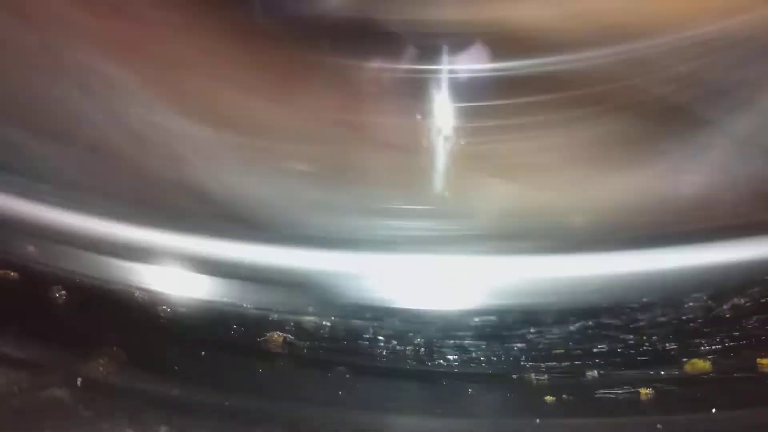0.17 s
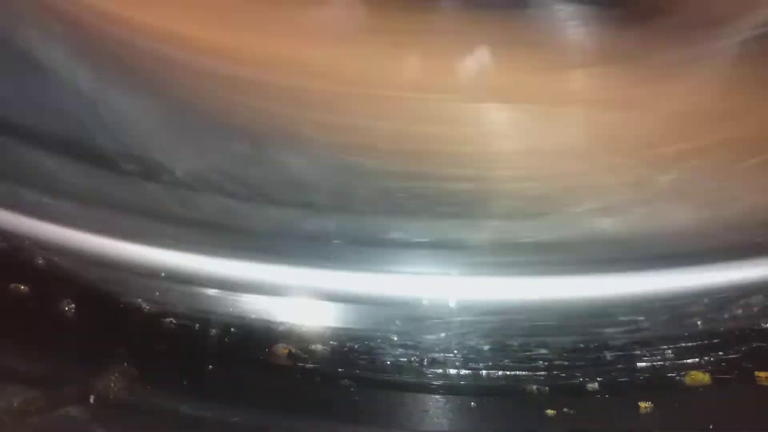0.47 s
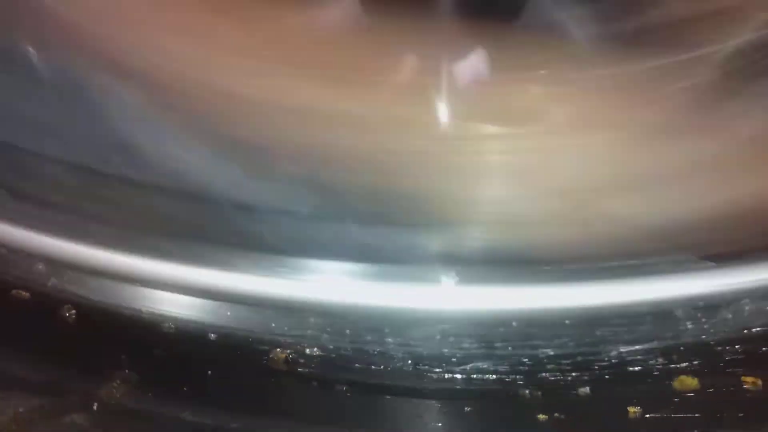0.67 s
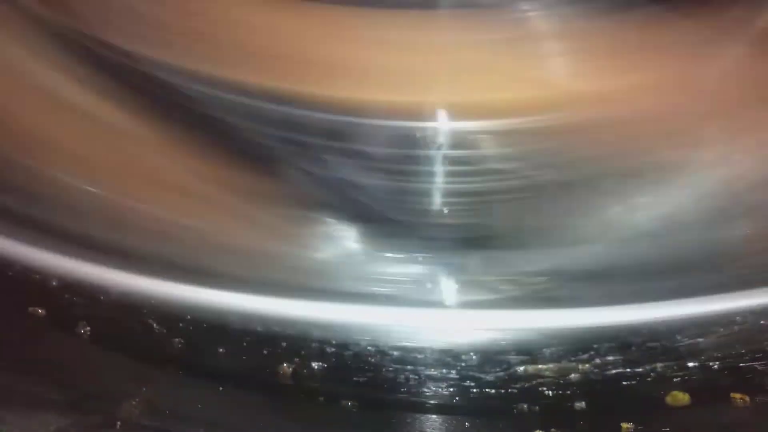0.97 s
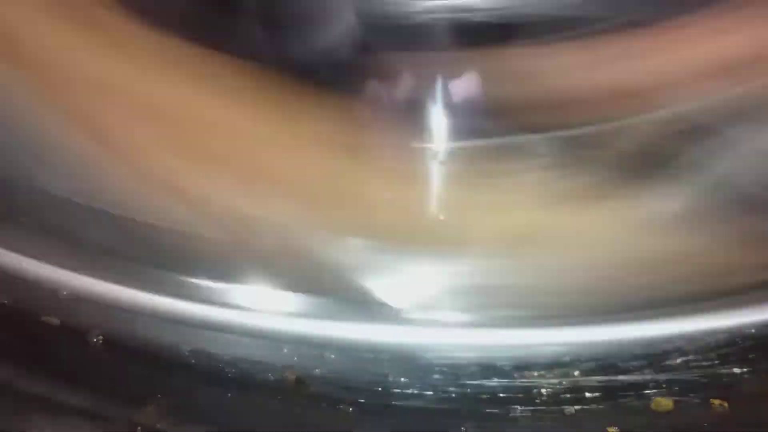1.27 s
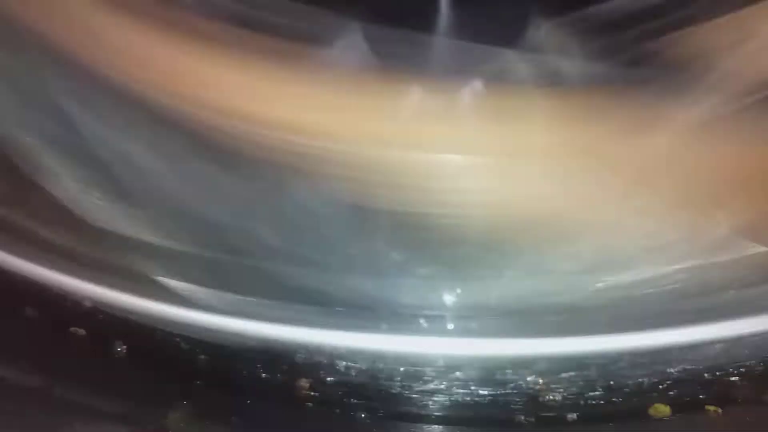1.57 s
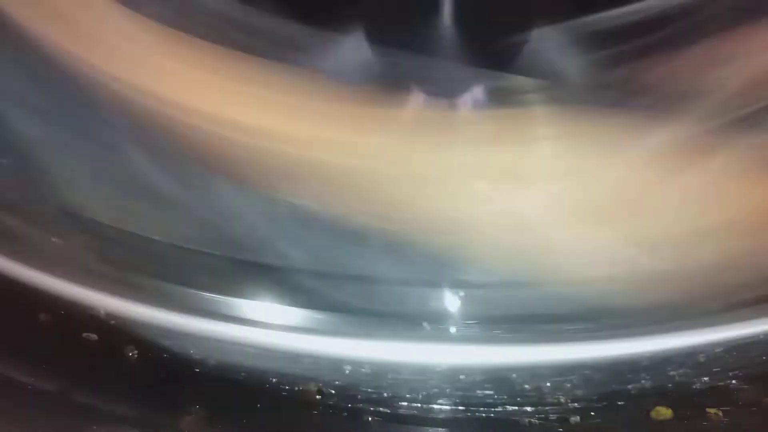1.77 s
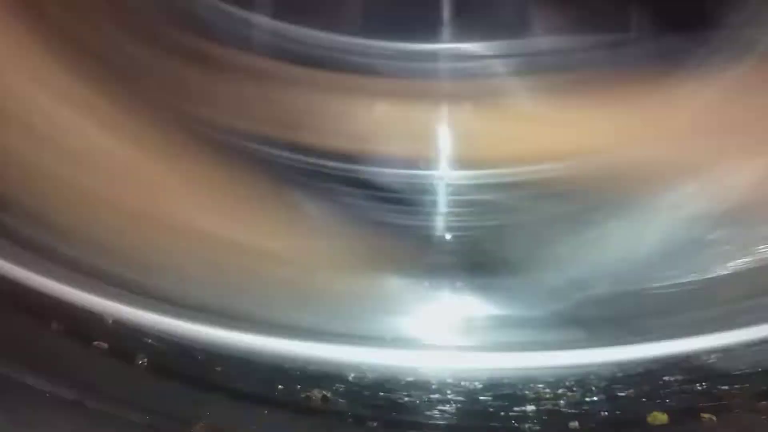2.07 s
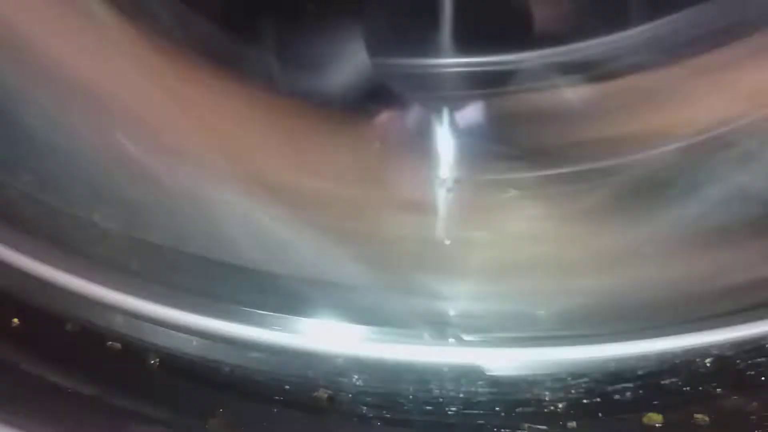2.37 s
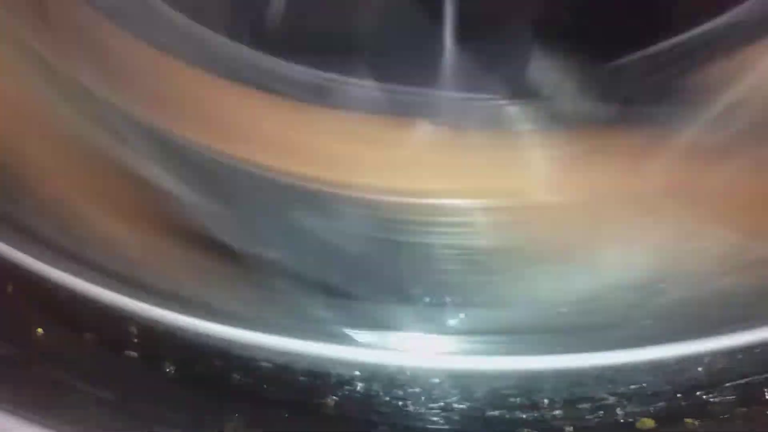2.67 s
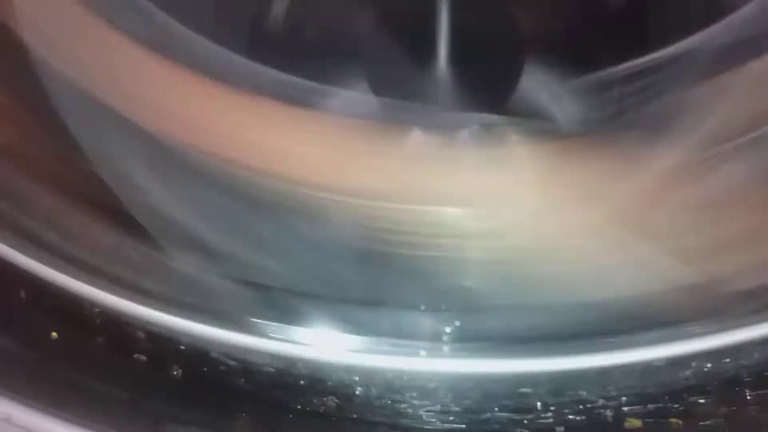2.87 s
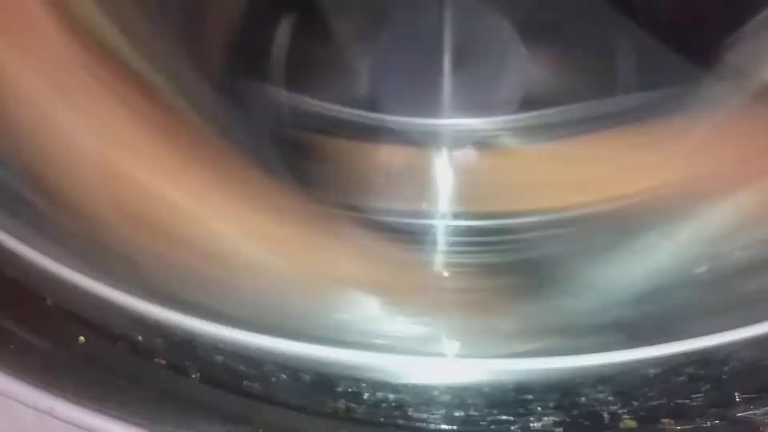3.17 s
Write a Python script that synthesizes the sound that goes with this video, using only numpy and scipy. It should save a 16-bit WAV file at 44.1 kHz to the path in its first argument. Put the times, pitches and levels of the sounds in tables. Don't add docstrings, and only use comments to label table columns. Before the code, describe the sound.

A honey extractor already spinning runs steadily throughout, about four turns a second: a wavering mid-pitched gear whir near 400 Hz, a fainter octave above, and a resonant steel rumble. Spray hisses about eight pulses a second, with irregular ticks and tiny drops. Low air buffets the close microphone, strongest from 0.6 to 1.9 seconds, easing by 2.6, leaving the whir and slightly brighter hiss clearer. Faint electronic whine lies underneath.

```python
import sys
import numpy as np
from scipy import signal
from scipy.fft import rfft, irfft
from scipy.io import wavfile

SR = 44100
rng = np.random.default_rng(int(sys.argv[2]) if len(sys.argv) > 2 else 0)


def store_wav(level_fs):
    pcm = np.round(np.clip(np.atleast_2d(level_fs), -1, 1) * 32767)
    wavfile.write(sys.argv[1], SR, pcm.T.astype(np.int16))


def boost_factor(decibels):
    exponent = np.asarray(decibels, float) / 20
    return 10 ** exponent


N = 146853
T = np.arange(N) / SR

# multiple_of_1_khz, level_db (rms)
CLOCK_WHINE = [(1, -50), (4, -66), (5, -71), (6, -69), (7, -79), (11, -86), (12, -86), (13, -81), (14, -77)]
SELF_NOISE_DB = -70.5

# time_s, level_db
GUST = [(0, -28.5), (.5, -42), (.6, -30), (.95, -24.5), (1.35, -22), (1.39, -37), (1.6, -25.5),
        (1.85, -27.5), (2.4, -33), (2.6, -45), (2.9, -39), (3.03, -39), (3.17, -31), (3.33, -50)]
# frequency_hz, density_db (per Hz)
WIND_COLOUR = [(25, -58), (45, 7), (70, 8), (110, 8.5), (180, -1.5), (300, -0.5), (500, -7), (900, -67)]
# peak_s, level_db, pitch_hz
BUFFETS = [(0.104, -18, 112), (0.166, -24, 101), (0.241, -26, 143), (0.3, -26, 108), (0.354, -19, 100),
           (0.414, -25, 116), (0.453, -18.5, 170), (0.525, -21.5, 122), (0.569, -20, 95), (0.599, -19, 131),
           (0.641, -14, 120), (0.665, -16, 117), (0.71, -12.5, 148), (0.752, -14.5, 97),
           (0.777, -14.5, 115), (0.829, -10, 133), (0.877, -16, 128), (0.924, -17, 157), (0.969, -10, 119),
           (1.012, -16.5, 110), (1.033, -15, 113), (1.083, -9.5, 103), (1.106, -6.5, 105),
           (1.142, -16, 143), (1.176, -7.5, 148), (1.209, -17, 111), (1.254, -14.5, 120),
           (1.285, -9.5, 118), (1.305, -11, 139), (1.422, -8.5, 126), (1.456, -26, 139), (1.507, -12, 129),
           (1.546, -15, 158), (1.606, -24, 105), (1.634, -18, 131), (1.669, -17, 107), (1.714, -10.5, 94),
           (1.783, -15.5, 122), (1.811, -9, 154), (1.864, -9.5, 194), (1.888, -16.5, 123),
           (1.969, -15, 111), (2.0, -16, 129), (2.034, -23, 96), (2.06, -24, 94), (2.089, -24, 96),
           (2.118, -24, 110), (2.162, -11.5, 137), (2.207, -15, 105), (2.225, -18.5, 141), (2.263, -18, 95),
           (2.31, -23, 123), (2.351, -12, 168), (2.389, -15.5, 100), (2.452, -16, 124), (2.502, -19, 141),
           (2.542, -24, 109), (2.946, -18.5, 136), (3.021, -22, 90), (3.296, -23, 99)]
# frequency_hz, density_db (per Hz)
PUFF_COLOUR = [(40, -19), (90, -0.5), (200, 2), (350, -3.5), (600, -6), (1000, -34)]
LUMP_DB, LUMP_HZ = 1.4, 25
BUFFET_CYCLES, BUFFET_TAIL = 3.05, 1.25
BUFFET_DB, PUFF_DB = -3.5, -12

# frequency_hz, density_db (per Hz)
HISS_COLOUR = [(1180, -12), (2000, -1), (2640, -1.5), (5790, -6), (6480, -9.5), (8770, -33.5),
               (13200, -14.5), (15800, -19)]
# time_s, level_db
SPRAY_CLOSENESS = [
    (0, -60.5),
    (.9, -60),
    (1.1, -58.3),
    (2.2, -57.7),
    (3.33, -56),
]
# peak_s, level_db
TICKS = [(0.11, -44), (0.168, -39), (0.193, -38), (0.398, -41), (0.413, -35), (0.434, -38), (0.464, -38),
         (0.54, -35.5), (0.57, -46), (0.593, -48), (0.643, -35.5), (0.833, -37), (0.904, -34), (0.924, -36),
         (1.007, -36), (1.059, -38), (1.077, -33), (1.145, -33), (1.178, -39), (1.276, -46), (1.302, -39),
         (1.325, -37), (1.397, -38), (1.413, -39), (1.525, -38), (1.542, -30), (1.569, -38), (1.594, -40),
         (1.644, -44), (1.695, -35), (1.77, -38), (1.786, -30), (1.81, -33), (1.887, -35), (1.91, -35),
         (2.055, -36), (2.082, -38), (2.144, -35), (2.275, -44), (2.298, -44), (2.408, -38), (2.521, -38),
         (2.54, -38), (2.561, -34), (2.578, -39), (2.632, -37), (2.654, -36), (2.737, -40), (2.819, -34),
         (2.859, -38), (2.985, -31.5), (3.028, -41), (3.109, -43), (3.218, -37), (3.27, -42)]
# peak_s, level_db
DROPS = [(0.108, -37), (0.329, -50), (0.361, -42), (0.397, -47), (0.467, -43), (0.579, -50), (0.592, -41),
         (0.833, -43), (1.145, -40), (1.179, -46), (1.549, -55), (1.726, -69), (1.819, -49), (2.003, -48),
         (2.167, -45), (2.176, -46), (2.769, -50), (2.775, -50), (3.028, -50), (3.035, -44), (3.109, -43),
         (3.203, -48), (3.243, -52), (3.32, -49)]
HISS_DB = -45.5
SPRAY_PER_S, SPRAY_DB, SPRAY_SPREAD_DB = 2700, -46.5, 1.5
SPRAY_TREBLE_HZ = 6200
FRAME_PASS_HZ = 8.18
PASS_S, PASS_SWING_DB = 0.084, 1.5
UNEVEN_S, UNEVEN_DB = 0.12, 0.9
FLUTTER_DB, FLUTTER_HZ = 0.8, 35
TICK_HZ, TICK_WIDTH_HZ, TICK_DECAY_S, TICK_DB = 4900, 3000, 0.0048, -4
DROP_HZ, DROP_WIDTH_HZ, DROP_DECAY_S, DROP_DB = 13600, 3600, 0.0036, -4.5

# pitch_hz, width_hz, level_db (rms), swell_db (per turn), swell_peak_s
DRUM_MODES = [(86, 14, -35, -1, 0), (267.5, 56, -38.5, 1, 0.23), (386, 26, -40, 3.5, 0.2),
              (412.8, 45, -47, -0.5, 0.29), (513, 31, -49, 5.5, .2), (636, 28, -40, 4, 0.21),
              (682, 44, -40, 4, 0.25), (792, 90, -44, 3, 0.17), (853, 35, -47, 4.5, 0.16),
              (1245, 90, -43, 1.5, 0.17), (1688, 80, -52.5, 5, 0.17), (2105, 80, -55, 6, 0.18),
              (2815, 200, -58, 3.5, 0.19), (4760, 500, -54, 3.5, 0.1)]
# frequency_hz, density_db (per Hz)
RUMBLE_COLOUR = [(25, -56), (50, -9), (85, -10.5), (200, -12.5), (450, -21), (1000, -17.5), (2000, -25.5),
                 (3000, -42)]
RUMBLE_DB = -31.5
# time_s, level_db
LOAD = [
    (0, -1),
    (.5, 0),
    (1.3, 1.2),
    (1.7, 0.6),
    (2.2, -0.5),
    (2.7, -0.54),
    (3.33, -1.5),
]

# time_s, rate_turns_per_s
SPEED = [
    (0, 4.103),
    (1.65, 4.11),
    (3.33, 4.124),
]
# order_of_turn, level_db
GEAR_LOW = [(91, -49), (92, -49), (93, -42), (94, -44), (95, -43), (96, -40), (97, -38), (98, -32),
            (99, -34.5), (100, -32), (101, -40), (102, -45), (103, -44)]
# order_of_turn, level_db
GEAR_HIGH = [(197, -44), (198, -39.5), (199, -40), (200, -46), (201, -48), (203, -51), (204, -51),
             (205, -52), (207, -47)]
WANDER_RAD, WAVER_DB, WANDER_HZ = 0.12, 0.8, 1.0


def curve(rows):
    return np.interp(T, *np.transpose(rows))


def rms_one(x):
    return x / np.sqrt(np.mean(x ** 2) + 1e-20)


def noise():
    return rng.standard_normal(N)


def drift(rate_hz):
    r = np.exp(-2 * np.pi * rate_hz * 40 / SR)
    white = rng.standard_normal(N // 40 + 2002)
    slow = signal.lfilter([1], [1, -2 * r, r * r], white)[2000:]
    return np.interp(np.arange(N) / 40, np.arange(len(slow)), rms_one(slow - slow.mean()))


def colour(x, spectrum):
    hz, db = np.transpose(spectrum)
    bins_hz = np.arange(1, N // 2 + 2) * SR / N
    gain_db = np.interp(np.log(bins_hz), np.log(hz), db, right=-150)
    return rms_one(irfft(rfft(x) * boost_factor(gain_db), N))


def resonate(x, hz, width_hz):
    r = np.exp(-np.pi * width_hz / SR)
    poles = [1, -2 * r * np.cos(2 * np.pi * hz / SR), r * r]
    return rms_one(signal.lfilter([1, 0, -1], poles, x))


def bursts(rows, hz, width_hz, decay_s):
    peak_s, db = np.transpose(rows)
    clicks = np.full(N, 1e-18)
    clicks[((peak_s - 0.5 * decay_s) * SR).astype(int)] = boost_factor(db)
    fall = np.exp(-1 / (decay_s * SR))
    rise = np.exp(-5 / (decay_s * SR))
    decaying = signal.lfilter([1], [1, -fall], clicks)
    envelope = signal.lfilter([1 - rise], [1, -rise], decaying)
    edges_hz = [hz - width_hz / 2, min(hz + width_hz / 2, 0.45 * SR)]
    band = signal.butter(4, edges_hz, "band", fs=SR, output="sos")
    return envelope * rms_one(signal.sosfilt(band, noise()))


def turns():
    return np.cumsum(curve(SPEED)) / SR


def once_a_turn(peak_s):
    return np.cos(2 * np.pi * (turns() - SPEED[0][1] * peak_s))


def electronics():
    out = boost_factor(SELF_NOISE_DB) * noise()
    for k, db in CLOCK_WHINE:
        out = out + boost_factor(db) * np.sqrt(2) * np.sin(2 * np.pi * 1000 * round(k) * T + k)
    return out


def wind():
    lumpy = boost_factor(LUMP_DB * drift(LUMP_HZ)) * colour(noise(), WIND_COLOUR)
    out = boost_factor(curve(GUST)) * rms_one(lumpy)
    puff = boost_factor(PUFF_DB) * colour(noise(), PUFF_COLOUR)
    for peak_s, db, hz in BUFFETS:
        u = (T - peak_s) * hz / BUFFET_CYCLES
        u = np.where(u > 0, u / BUFFET_TAIL, u)
        envelope = np.cos(np.pi * np.clip(u, -0.5, 0.5)) ** 2
        push = np.sin(2 * np.pi * hz * (T - peak_s) + rng.uniform(0, 2 * np.pi))
        out = out + boost_factor(db) * envelope * (boost_factor(BUFFET_DB) * push + puff)
    return out


def spray():
    grain_db = SPRAY_SPREAD_DB * np.minimum(rng.exponential(1, N), 5)
    grains = (rng.random(N) < SPRAY_PER_S / SR) * boost_factor(grain_db) * rng.choice([-1, 1], N)
    hiss = boost_factor(HISS_DB) * colour(noise(), HISS_COLOUR) + boost_factor(SPRAY_DB) * colour(grains, HISS_COLOUR)
    high_pass = signal.butter(4, SPRAY_TREBLE_HZ, "high", fs=SR, output="sos")
    treble = signal.sosfiltfilt(high_pass, hiss)
    near_db = curve(SPRAY_CLOSENESS)
    return hiss + treble * (boost_factor(near_db - near_db.mean()) - 1)


def frames():
    sweep_db = PASS_SWING_DB * np.cos(2 * np.pi * FRAME_PASS_HZ * (T - PASS_S))
    sweep_db = sweep_db + UNEVEN_DB * np.cos(np.pi * FRAME_PASS_HZ * (T - UNEVEN_S))
    sweep_db = sweep_db + FLUTTER_DB * drift(FLUTTER_HZ)
    ticks = boost_factor(TICK_DB) * bursts(TICKS, TICK_HZ, TICK_WIDTH_HZ, TICK_DECAY_S)
    drops = boost_factor(DROP_DB) * bursts(DROPS, DROP_HZ, DROP_WIDTH_HZ, DROP_DECAY_S)
    return boost_factor(sweep_db) * spray() + ticks + drops


def drum():
    out = boost_factor(RUMBLE_DB + 0.7 * drift(6)) * colour(noise(), RUMBLE_COLOUR)
    for hz, width_hz, db, swell_db, peak_s in DRUM_MODES:
        each_hz = 1.26 * width_hz
        ring = resonate(resonate(noise(), hz, each_hz), hz, each_hz)
        out = out + boost_factor(db + swell_db * once_a_turn(peak_s) + 1.85 * drift(5.3)) * ring
    return out


def gear(orders, mesh, tight_s, lead_rad, scatter_rad):
    out = 0
    shared_slip = WANDER_RAD * drift(WANDER_HZ)
    angle = 2 * np.pi * turns()
    tight_angle = 2 * np.pi * SPEED[0][1] * tight_s
    for k, db in orders:
        away = abs(k - mesh)
        start = lead_rad * away - (k - mesh) * tight_angle
        start = start + scatter_rad * max(away - 1, 0) * rng.standard_normal()
        slip = shared_slip + WANDER_RAD * (1 + away) * drift(WANDER_HZ)
        out = out + boost_factor(db + WAVER_DB * drift(WANDER_HZ)) * np.sin(k * angle + start + slip)
    return out


def scene():
    low = gear(GEAR_LOW, mesh=99, tight_s=0, lead_rad=np.pi / 2, scatter_rad=0.6)
    high = gear(GEAR_HIGH, mesh=198, tight_s=0.11, lead_rad=0, scatter_rad=0.2)
    mix = electronics() + wind() + frames() + boost_factor(curve(LOAD)) * (drum() + high) + low
    return mix[None]


def band_limit(x):
    return signal.sosfilt(signal.butter(12, 15940, fs=SR, output="sos"), x)


def record(dry):
    limit = 0.6
    rounded = limit * np.tanh(dry / limit)
    low_cut = signal.butter(3, 47, "high", fs=SR, output="sos")
    top_cut = signal.ellip(14, 0.3, 60, 15730, fs=SR, output="sos")
    mix = signal.sosfilt(top_cut, signal.sosfilt(low_cut, rounded))
    return band_limit(mix)


dry = scene()
out = record(dry)
store_wav(out)
```